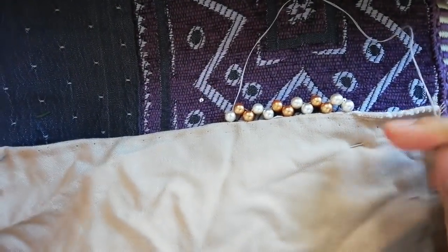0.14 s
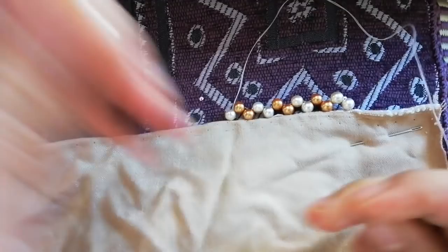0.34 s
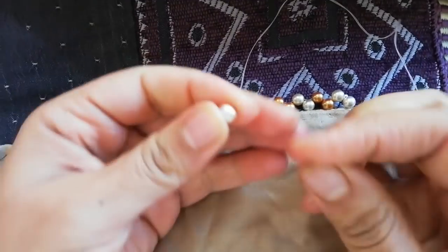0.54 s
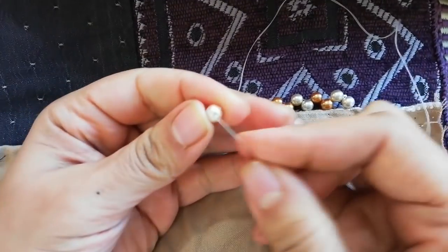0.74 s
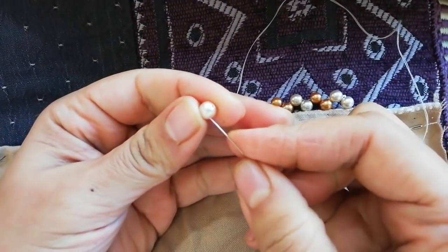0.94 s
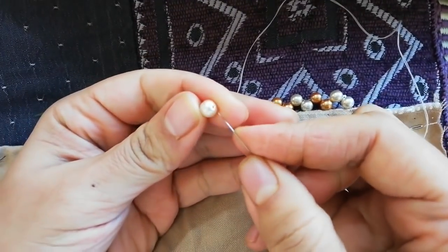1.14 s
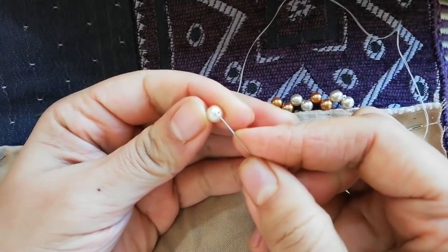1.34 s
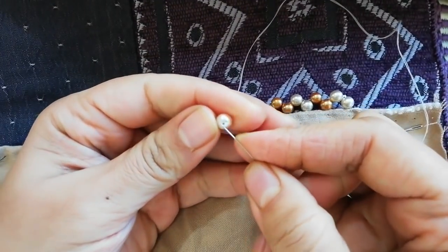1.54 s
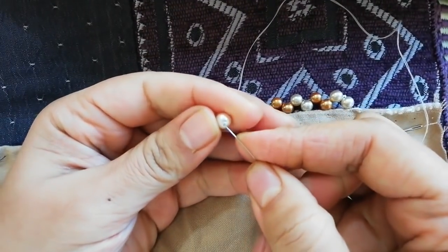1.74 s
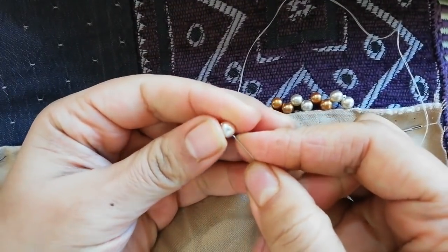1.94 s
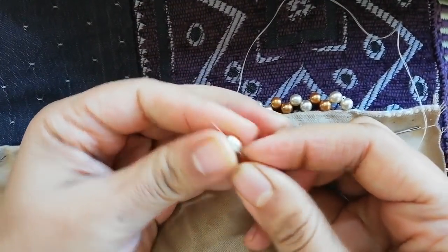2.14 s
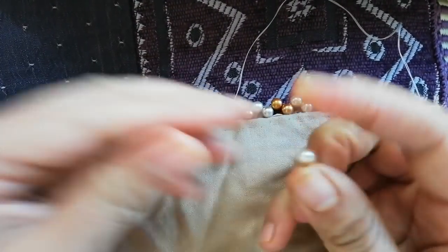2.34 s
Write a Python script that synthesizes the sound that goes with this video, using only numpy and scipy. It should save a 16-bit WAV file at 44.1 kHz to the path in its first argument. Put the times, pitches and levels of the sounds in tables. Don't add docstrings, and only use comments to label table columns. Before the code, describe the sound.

Tiny hard beads click together with a bright, high glassy ring, in a dense burst from 0.05 to 0.16 seconds, slightly left. Isolated fainter ticks come at 0.24 and 0.29, then a weaker, damped stirring cluster at 0.39-0.45. Soft low bumps follow near 0.5 and 1.4 over quiet room hush, with a barely audible low engine hum around 1.5. Hands and cloth rustle softly at 2.2-2.4.

```python
import sys
import numpy as np
from scipy import signal
from scipy.fft import rfft, irfft, next_fast_len
from scipy.io import wavfile
from scipy.ndimage import map_coordinates

SR = 44100
rng = np.random.default_rng(int(sys.argv[2]) if len(sys.argv) > 2 else 0)


def gain_from_db(level_db):
    decades = np.asarray(level_db, float) / 20
    return 10 ** decades


def unload_audio(sound):
    columns = np.transpose(np.atleast_2d(sound))
    steps = np.round(np.clip(columns, -1, 1) * 32767)
    wavfile.write(sys.argv[1], SR, steps.astype(np.int16))


N = 106104

# frequency in Hz, density in dB per Hz.
HUSH_COMMON = [(90, 1.5), (330, 4.5), (560, -5), (1300, 1), (2300, -5), (5000, -4), (10000, -9),
               (16000, -17.5)]
# frequency in Hz, density in dB per Hz.
HUSH_OPPOSED = [(20, 0), (130, -1), (330, 1), (700, -0.5), (1300, -4), (2300, -5), (9000, -8.5),
                (16000, -18.5)]
# time in seconds, level in dB, left-right difference in dB.
HAND_STROKES = [(0, -63, 6), (.06, -87, -2), (.2, -60, -2), (.27, -72.5, 16), (.33, -65.5, 12),
                (.47, -64, 3), (.57, -60, 6), (.68, -72.5, 13.5), (.8, -69, 4), (.95, -81, 14),
                (1.3, -91, 13), (1.5, -71, 12.5), (1.75, -80, 1), (2.1, -75, 2), (2.2, -59.5, 8),
                (2.27, -55, 14), (2.34, -56.5, 6.5), (2.41, -71, 10)]
# frequency in Hz, level in dB.
FIBRE_COLOUR = [(2000, -16), (6000, -12.5), (8400, -8), (10300, 0), (11600, -7.5), (13500, -18),
                (16000, -40)]
# frequency in Hz, level in dB.
SLEEVE_COLOUR = [(150, -5), (280, 8.5), (600, 1), (1000, 5.5), (3600, 1.5), (6000, -4.5), (9000, -16),
                 (14000, -36)]
# time in seconds, peak level in dB, pitch in Hz.
STAND_BUMPS = [
    (0.449, -52, 217),
    (0.491, -57, 132),
    (0.501, -51, 183),
    (0.509, -56.5, 112),
    (1.333, -58, 89),
    (1.364, -54, 87),
    (1.408, -58, 91.5),
    (1.438, -54, 132),
    (1.591, -57.5, 90),
    (2.07, -60, 88),
]
# frequency in Hz, level in dB.
RUMBLE_COLOUR = [(15, 2), (60, 2), (110, -6), (260, -13), (400, -25), (520, -42)]
# time in seconds, rumble level in dB.
TABLE_LEANING = [(0, -68.5), (.3, -70.5), (.48, -67), (.6, -71), (1.1, -66.5), (1.22, -71.5), (1.36, -65),
                 (1.6, -66.5), (1.75, -67), (2.07, -72), (2.15, -70.5), (2.4, -70)]
# time in seconds, ring level in dB, left-right difference in dB,
# bare tick over the ring in dB, gain of the rim family of modes in dB.
BEAD_CONTACTS = [(.0535, -63, 7, 29, 0), (.0640, -43, 11, 19, -2), (.0668, -42, 2, 0, 6),
                 (.0731, -25.5, 8, 3, 5), (.0738, -30, 6, 25.5, -4), (0.0756, -27, 10.5, 0, 1),
                 (.0840, -31, 12, 4, 3), (.0868, -39, 3, 13, 11), (.1000, -22, 2.5, 11, -2),
                 (.1008, -28, 18, 16.5, -1.5), (.1024, -34, 7, -3, 7), (.1205, -23.5, 11.5, -1, -1),
                 (.1366, -28, 9, 13, 3), (.1495, -36.5, 6.5, 27.5, 16), (.1598, -34, 14, 20, 10),
                 (.2325, -64, 9, 32, 3), (.2388, -43.5, 12, 8, 4), (.2412, -44.5, 16, -6, 9),
                 (.2893, -62.5, 23, 30.5, 0), (.3883, -48, 8, 7, -13), (.3915, -44, 12, 6, -3),
                 (.4033, -45, 18.5, 18, 4), (.4085, -57, 13, 13, -14), (0.4141, -42.5, 10, 5, 8),
                 (.4215, -60, 19, 10, 11), (.4255, -61, 5, 7, 9), (.4392, -69, 8, 22, 0),
                 (.4405, -55, 14, 26, -4), (.4508, -53.5, 9, 9, 21), (1.872, -73.5, 16, 30, 0)]
MODE_HZ = [3800, 4385, 5600, 6620, 7600, 9070, 9190, 9367, 10960, 12150, 12410, 13550, 14420, 14990]
# level in dB, t60 in seconds, left-right difference in dB, family weight, positive for the
DISH_MODES = [(-19, 0.0097, -6.5, -0.58), (-37, 0.09, 5, 0.092), (-24, 0.03, 0, -1.6), (-29, 0.08, -8, 1),
              (-31, 0.0066, 7, 0), (2, .013, -1.5, 0.4), (-17, 0.07, 5, 0), (-3, 0.028, 1.5, -0.15),
              (-14, 0.04, 5.5, 1), (-25.5, .04, 10, -1.4), (-26, 0.04, 5, 0), (-12, 0.028, -3, 0.85),
              (-8, 0.025, 0, 0.47), (-25, 0.018, -4, 0.61)]
# frequency in Hz, level in dB.
TICK_COLOUR = [(1500, -49), (2900, -34.5), (3800, -15.5), (7500, -23), (9500, 9), (11500, 3),
               (14500, -14.5), (16000, -19)]
# frequency in Hz, level in dB.
CHATTER_COLOUR = [(2300, -29), (3300, -2), (4400, -7), (5600, 4), (7000, 3), (8500, -32)]
# frequency in Hz, level in dB.
THUD_COLOUR = [(700, -50), (1150, -4), (2200, 0), (3500, -6), (6000, -14)]
# delay in seconds, left level in dB, right level in dB.
WALL_ECHOES = [(.0108, -33, -24), (.0125, -34, -37), (.0215, -47, -19), (.031, -37, -28)]
# frequency in Hz, t60 in seconds.
ROOM_DECAY = [(2000, 0.12), (9000, 0.35), (15000, 0.1)]
ROOM_LEVEL_DB = [-12.5, -16]
# time in seconds, frequency in Hz.
ENGINE_HZ = [(1.3, 54.15), (1.65, 49.2)]
# time in seconds, half width in seconds, depth in dB.
GAIN_DIPS = [
    (0.0603, 0.0013, 25),
    (0.3845, 0.0016, 10),
]


def clock():
    return np.arange(N) / SR


def unit(x):
    return x / np.sqrt(np.mean(x ** 2) + 1e-20)


def along(points, hz):
    f, v = np.transpose(points)
    return np.interp(np.log(hz + 1), np.log(f + 1), v)


def coloured(x, spectrum):
    m = next_fast_len(x.shape[-1] + SR // 10)
    gain = gain_from_db(along(spectrum, np.fft.rfftfreq(m, 1 / SR)))
    return irfft(rfft(x, m) * gain, m)[..., :x.shape[-1]]


def struck(x, spectrum):
    m = 4096
    cep = irfft(np.log(gain_from_db(along(spectrum, np.fft.rfftfreq(m, 1 / SR)))), m)
    cep = cep * np.r_[1, np.full(m // 2 - 1, 2), 1, np.zeros(m // 2 - 1)]
    response = irfft(np.exp(rfft(cep)), m)[None, :m // 8]
    return signal.fftconvolve(x, response, axes=1)[:, :x.shape[1]]


def wobble(rate):
    return map_coordinates(rng.standard_normal(N // 20), [clock() * rate])


def noise(spectrum, channels=2):
    return unit(coloured(rng.standard_normal((channels, N)), spectrum))


def sides(pan_db):
    return gain_from_db(np.array([pan_db / 2, -pan_db / 2]))


def hush():
    mid = gain_from_db(-67.5 + 0.16 * wobble(3.45)) * noise(HUSH_COMMON, channels=1)[0]
    side = gain_from_db(-67.5 + 0.24 * wobble(15)) * noise(HUSH_OPPOSED, channels=1)[0]
    return np.array([mid + side, mid - side])


def hands():
    t = clock()
    s, level_db, pan_db = np.transpose(HAND_STROKES)
    grain = gain_from_db(2.0 * wobble(40.18) + 0.62 * wobble(600))
    fizz = unit(grain * noise(FIBRE_COLOUR))
    fizz = gain_from_db(np.interp(t, s, level_db)) * sides(np.interp(t, s, pan_db)) * fizz

    middle_s, half_s, sleeve_db, sleeve_pan_db = 2.31, 0.077, -63.5, 7
    swell = np.exp(-((t - middle_s) / half_s) ** 2) * gain_from_db(sleeve_db + 1.8 * wobble(250))
    brush = 0.9 * noise(SLEEVE_COLOUR) + 0.62 * noise(SLEEVE_COLOUR, channels=1)
    return fizz + swell * sides(sleeve_pan_db)[:, None] * brush


def handling():
    t = clock()
    width_cycles, swing_db = 0.19, 2
    pushes = np.zeros(N)
    for s, db, hz in STAND_BUMPS:
        u = t - s
        pulse = np.exp(-.5 * (u * hz / width_cycles) ** 2)
        pushes += gain_from_db(db) * pulse * np.cos(2 * np.pi * hz * u)
    rumble_db = np.interp(t, *np.transpose(TABLE_LEANING)) + swing_db * wobble(7.2)
    return pushes + gain_from_db(rumble_db) * noise(RUMBLE_COLOUR, channels=1)


def dish_ring(u, stirred, rim_db, lead):
    hz = np.array(MODE_HZ)
    db, t60, pan_db, family = np.transpose(DISH_MODES)
    scatter_db, scatter_turns, wander_hz, attack_s = 1.2, .05, 5, .0002
    after_db, after_longer = -19, 2.5
    stir_dull_db, stir_damp = 9, .7
    life = (t60 * (stir_damp if stirred else 1))[:, None]
    mode_db = db + rim_db * family - stir_dull_db * stirred * (hz > hz[-3])
    size = gain_from_db(mode_db + scatter_db * rng.standard_normal(len(hz))) * sides(pan_db)

    turns = hz[:, None] * u + scatter_turns * rng.standard_normal((len(hz), 1))
    steps = rng.standard_normal((len(hz), len(u))) * (u > 0)
    wander = np.sqrt(2 * np.pi * wander_hz / SR) * np.cumsum(steps, 1)
    phase = 2 * np.pi * turns + lead[..., None] + wander

    decay = gain_from_db(-60 * u / life) + gain_from_db(after_db - 60 * u / life / after_longer)
    return np.sum(size[..., None] * decay * np.sin(phase), 1) * (1 - np.exp(-u / attack_s))


def contact_tick(u):
    t60_s, snap = .0034, 2.5
    burst = rng.standard_normal(len(u)) + .5 * rng.standard_normal((2, len(u)))
    burst[:, np.argmax(u > 0)] += snap * 2
    tick = struck(burst * gain_from_db(-60 * u / t60_s) * (u > 0), TICK_COLOUR)
    return tick / np.abs(tick).max(1, keepdims=True)


def bead_chatter(u):
    level_db, t60_s = -27, .06
    rattle = unit(struck(rng.standard_normal((2, len(u))), CHATTER_COLOUR))
    return rattle * gain_from_db(level_db - 60 * u / t60_s) * (u > 0)


def dish():
    out = np.zeros((2, N + SR))
    t = np.arange(SR // 5) / SR
    stir_s = .2
    lead = rng.uniform(-0.93, 1, len(MODE_HZ)) * np.array([[1], [-1]])
    for s, level_db, where_db, tick_db, rim_db in BEAD_CONTACTS:
        start = int(s * SR) - 100
        u = np.clip(t + start / SR - s, 0, None)
        sound = dish_ring(u, s > stir_s, rim_db, lead) + bead_chatter(u)
        sound = sound + gain_from_db(tick_db - 12.5) * contact_tick(u)
        out[:, start:start + len(t)] += gain_from_db(level_db) * sides(where_db)[:, None] * sound
    return out[:, :N]


def thud():
    start_s, level_db, hz, t60_s = .0733, -49, 1920, 0.0061
    u = clock() - start_s
    puff = np.sin(2 * np.pi * hz * u) + .5 * rng.standard_normal((2, N))
    puff = struck(puff * gain_from_db(-60 * np.abs(u) / t60_s) * (u > 0), THUD_COLOUR)
    return gain_from_db(level_db) * puff / np.abs(puff).max()


def room(x):
    hz, t, z = signal.stft(rng.standard_normal((2, SR // 2)), SR, nperseg=256)
    tail = signal.istft(z * gain_from_db(-60 * t / along(ROOM_DECAY, hz)[:, None]), SR, nperseg=256)[1]
    tail = tail / np.linalg.norm(tail[0])
    gap = round(0.0022 * SR)
    source = np.pad(x.mean(0), (gap, 0))[None]
    wet = signal.fftconvolve(source, tail, axes=1)[:, :N]
    walls = np.zeros((2, N))
    for s, left_db, right_db in WALL_ECHOES:
        walls += gain_from_db([[left_db], [right_db]]) * np.roll(x[0], round(s * SR))
    return gain_from_db(ROOM_LEVEL_DB)[:, None] * wet + walls


def drone():
    t = clock()
    middle_s, half_s, level_db, second_db = 1.46, 0.135, -69, 2
    firing_hz = np.interp(t, *np.transpose(ENGINE_HZ)) + 1.59 * wobble(12.03)
    turn = 2 * np.pi * np.cumsum(firing_hz) / SR
    swell = np.exp(-((t - middle_s) / half_s) ** 4) * gain_from_db(level_db + 2.3 * wobble(20))
    return swell * (np.sin(turn) + gain_from_db(second_db) * np.sin(2 * turn))


def scene():
    background = hush() + hands() + handling()
    bead = dish() + thud()
    return background + bead + room(bead) + drone()


def low_pass(x):
    return signal.sosfilt(signal.butter(12, 16320, fs=SR, output="sos"), x)


def record(dry):
    t = clock()
    dip_db = sum(db * np.exp(-.5 * ((t - s) / w) ** 2) for s, w, db in GAIN_DIPS)
    top_hz = 16150
    mix = coloured(dry * gain_from_db(-dip_db), [(top_hz - 300, 0), (top_hz, -60)])
    return low_pass(mix)


dry = scene()
out = record(dry)
unload_audio(out)
```